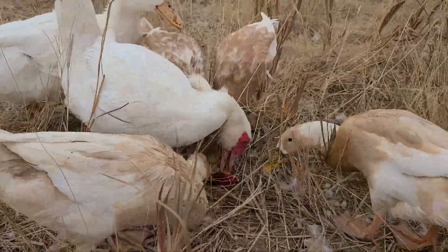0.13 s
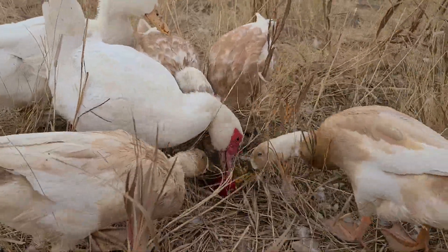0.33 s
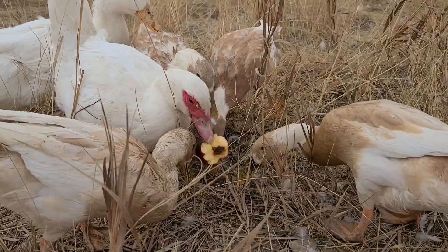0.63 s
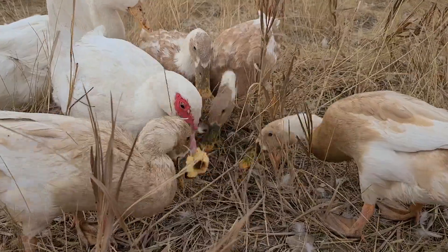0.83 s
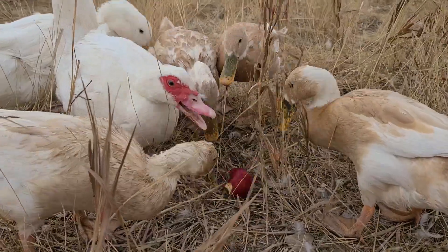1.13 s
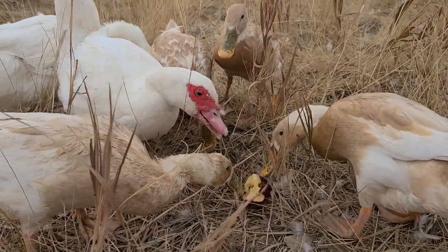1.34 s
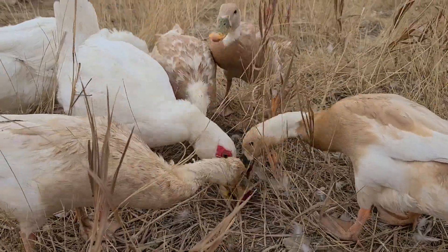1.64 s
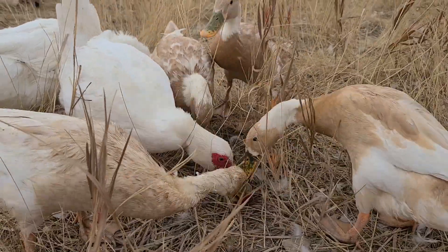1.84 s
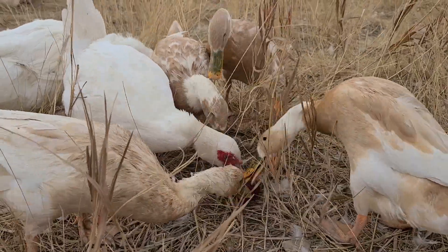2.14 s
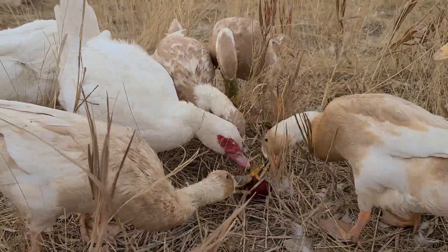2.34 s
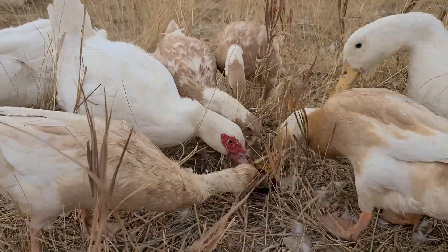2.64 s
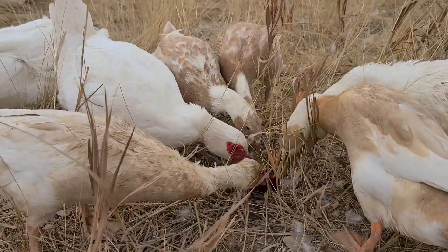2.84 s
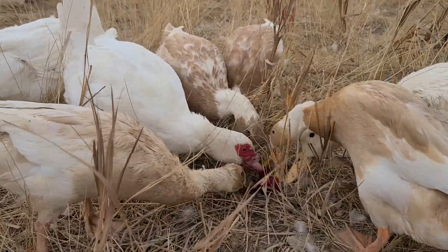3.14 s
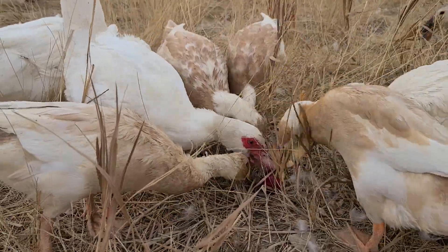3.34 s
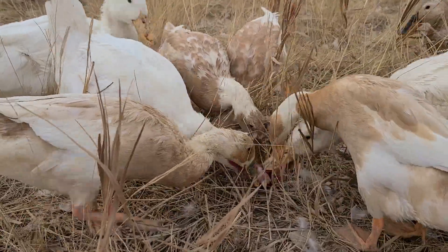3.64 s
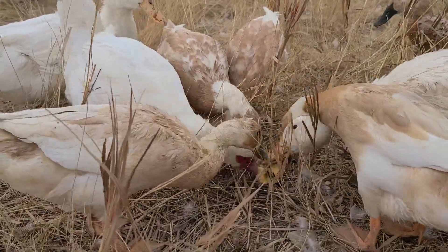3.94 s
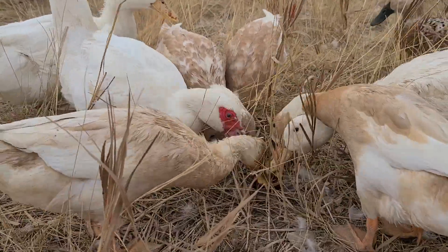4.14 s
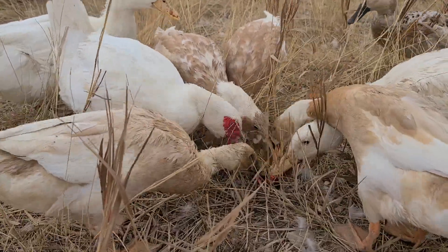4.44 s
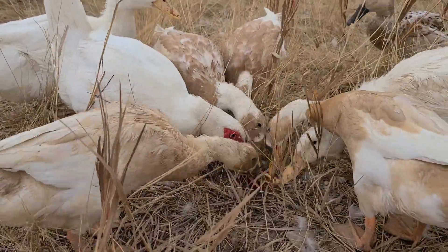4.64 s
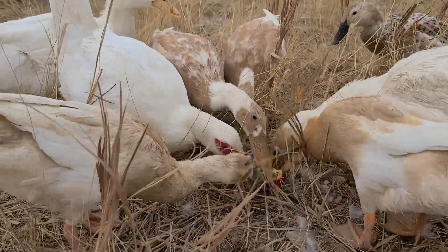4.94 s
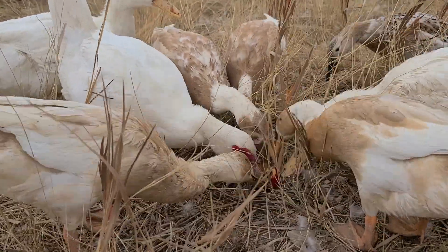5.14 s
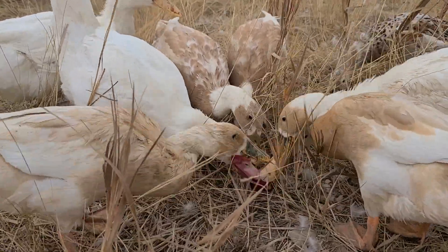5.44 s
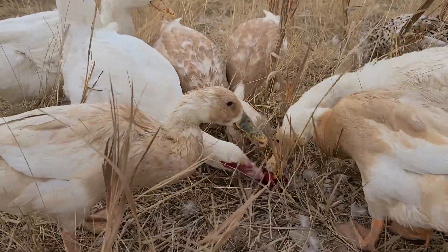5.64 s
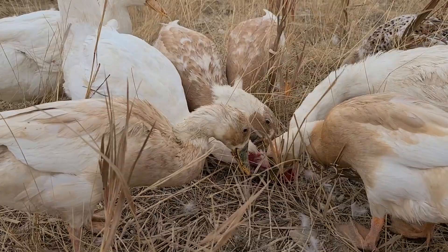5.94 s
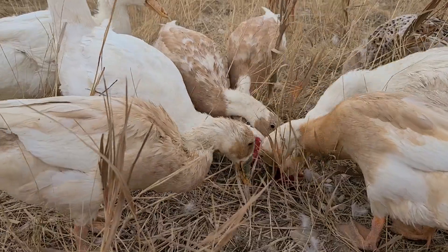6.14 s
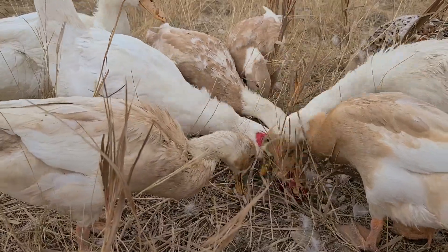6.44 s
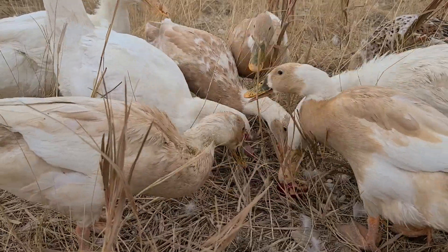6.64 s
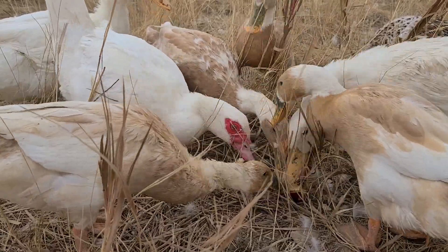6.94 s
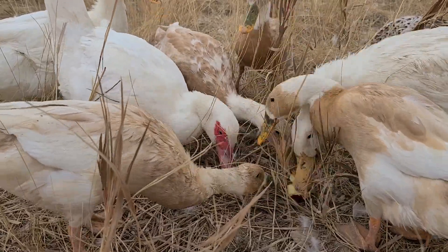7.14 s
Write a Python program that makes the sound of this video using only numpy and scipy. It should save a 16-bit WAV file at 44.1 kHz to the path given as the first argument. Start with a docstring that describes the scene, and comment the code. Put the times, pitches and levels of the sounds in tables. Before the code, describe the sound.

A flock of ducks feeds close by in dry grass, heard in open air through a phone's stereo microphone. At 0.1 and 0.26 s two loud, low, throaty quacks burst out, with a softer one just after. From about 0.75 to 1.65 s sharper, nasal quacks mix with hoarse huffs and short piping squeaks, the strongest squeak near 1.6 s. Between 1.9 and 3.5 s it is mainly squeaks sliding down, dull closed-bill clucks, two rough huffs around 2 s and one very faint quack at 2.9. Short quacks return at 3.6 and 3.9 s, then scattered around 4.4, 4.7, 5.1, 5.6 and 6 s with more huffs. Stalks rustle and snap throughout, a crisp snap standing out at 4.7 s. Low wind bumps peak near 4.5 and 5 s over a faint far hush. After 6 s, quieter huffs, low squeaks and clucks remain until about 7.3 s.

```python
"""Ducks cluck, pipe short squeaks, quack and huff while dry stalks snap and rustle in a light wind.
They crowd round a scrap of fruit in dry grass, a step from a two-port phone and a little to one side.
Quacks are membrane pulses and air puffs in throat and bill; squeaks are gliding breathy tones; huffs are
noise in slow flaps; clucks are decaying modes. Snaps, rustle, wind and far hush are coloured noise."""
import sys
import numpy as np
from scipy import signal
from scipy.fft import rfft, irfft, next_fast_len
from scipy.io import wavfile
from scipy.ndimage import uniform_filter1d

SR = 44100
rng = np.random.default_rng(int(sys.argv[2]) if len(sys.argv) > 2 else 0)


def to_wav(s):
    """Save 16-bit WAV."""
    ch = np.atleast_2d(s).T  # columns
    pcm = np.round(np.clip(ch, -1, 1) * 32767)  # PCM
    wavfile.write(sys.argv[1], SR, pcm.astype(np.int16))


N = 321489
TIME = np.arange(N) / SR


def undb(db):
    """Amplitude ratio of a level in dB."""
    return 10 ** (np.asarray(db) / 20)


def unit(x):
    """Scale to RMS 1."""
    return x / np.sqrt(np.mean(x ** 2))


def ring(x, hz, width_hz):
    """Resonance with gain 1 at its centre."""
    return signal.lfilter(*signal.iirpeak(hz, hz / width_hz, SR), x)


def steep(x, hz, width_hz):
    """Two resonances in series at one centre: steeper skirts than one."""
    return ring(ring(x, hz, width_hz), hz, 1.6 * width_hz)


def shape(x, points, trail=((0, 0), (1, 0))):
    """Colour by (f/Hz, gain/dB) points and hold back by (f/Hz, lag/rad) points."""
    size = next_fast_len(N + 64)
    f_hz = np.arange(size // 2 + 1) * SR / size
    hz, db = np.transpose(points)
    gain = undb(np.interp(np.log(f_hz + 1), np.log(hz), db))
    lag_rad = np.interp(f_hz, *np.transpose(trail))
    return irfft(rfft(x, size) * gain * np.exp(-1j * lag_rad), size)[:N]


def walk(rate_hz, size=N):
    """Random levels held 1 / rate_hz seconds and smoothed twice; spread near 1."""
    hold = int(SR / rate_hz)
    steps = np.repeat(rng.standard_normal(size // hold + 1), hold)
    return 1.7 * uniform_filter1d(uniform_filter1d(steps, hold), hold)[:size]


def add(out, x, start_s):
    """Mix x into out from start_s."""
    i = int(start_s * SR)
    out[i:i + len(x)] += x[:N - i]


def around(knots_s, db, pad_s, fade_s):
    """Time axis padded round a call, and its gain, falling 60 dB per fade_s outside the knots."""
    t = np.arange(knots_s[0] - pad_s, knots_s[-1] + pad_s, 1 / SR)
    outside_s = np.maximum(np.maximum(knots_s[0] - t, t - knots_s[-1]), 0)
    return t, undb(np.interp(t, knots_s, db) - 60 * outside_s / fade_s)


def field():
    """Steady far hush of coloured noise: one part reaches both ports, one differs at each."""
    # hush spectrum: f/Hz, relative density/dB
    field_colour = [(35, -32), (60, -0.5), (216, -1), (361, -10.5), (467, -8), (1110, -11), (1650, -9.5),
                    (3550, -25.5), (5160, -49), (7150, -36), (15800, -76)]
    level_db, shared_power = -51.5, 0.58
    hush = [unit(shape(rng.standard_normal(N), field_colour)) * undb(level_db + 0.99 * walk(7.0))
            for _ in range(3)]
    shared = np.sqrt(shared_power) * hush[0]
    apart = np.sqrt(1 - shared_power) * np.array(hush[1:])
    return shared, apart


def wind():
    """Eddies push on each port independently: low noise in short gusts."""
    # mean gust contour: t/s, level/dB
    gust_points = [(0.0, -50), (1.48, -51.5), (1.58, -29), (1.78, -48), (2.41, -31), (2.45, -46.5),
                   (2.7, -30), (2.76, -40.5), (3.36, -47), (3.67, -29), (3.73, -40.5), (4.26, -31.5),
                   (4.36, -42), (4.48, -23.5), (4.56, -41), (4.87, -40.5), (5.05, -23.5), (5.13, -40.5),
                   (6.12, -39.5), (6.81, -53.5), (6.95, -38), (7.28, -44.5)]
    # wind spectrum: f/Hz, relative gain/dB
    wind_colour = [(20, -14.5), (45, 0.5), (70, -1), (100, -6), (140, -18.5), (250, -27.5), (500, -62)]
    lean_db = 0.5  # left port above the contour, right port below
    gusts_db = np.interp(TIME, *np.transpose(gust_points))
    ports = []
    for port_db in (lean_db, -lean_db):
        gain = undb(gusts_db + port_db + 3.77 * walk(16))
        ports.append(gain * unit(shape(rng.standard_normal(N), wind_colour)))
    return np.array(ports)


def grass():
    """Snaps are brief decaying noise bands; rustle is grainy hiss that swells when a bird brushes past."""
    # dry stalks snapping: t/s, level before decay/dB, centre f/Hz
    snap_table = [(1.0094, -39, 3450), (1.836, -44, 3540), (1.9915, -39, 3870), (2.503, -39.5, 4650),
                  (3.491, -41, 3400), (3.6914, -35, 6800), (3.739, -39, 3890), (3.8123, -36.5, 9450),
                  (3.9743, -38.5, 4150), (4.0372, -37, 3560), (4.069, -33.5, 6800), (4.492, -37, 4000),
                  (4.671, -28, 4790), (5.384, -36.5, 3540), (6.2853, -43, 4900), (6.3118, -36, 8500),
                  (6.814, -39, 9800), (7.1701, -38, 3180)]
    # birds brushing through stalks: middle t/s, peak level/dB, 1/e power width/s
    swish_table = [(0.0, -57, 0.12), (0.32, -58, 0.2), (0.662, -46, 0.048), (1.137, -46.5, 0.067),
                   (1.277, -50, 0.16), (1.612, -45.5, 0.12), (2.182, -49, 0.21), (2.852, -44.5, 0.1),
                   (3.617, -47, 0.14), (3.823, -60, 0.05), (4.07, -45.5, 0.06), (4.377, -63, 0.14),
                   (4.69, -42.5, 0.076), (4.973, -42, 0.068), (5.151, -45, .15), (5.623, -51, 0.14),
                   (6.294, -52, 0.062), (6.657, -54, 0.39), (7.25, -53.5, 0.39)]
    rustle_db = -51  # the flock never stands quite still
    snap_t60_s = 0.027
    out, t = np.zeros((2, N)), TIME[:900]
    for s, db, hz in snap_table:
        for port in out:
            crack = unit(ring(rng.standard_normal(len(t)), hz, 0.2 * hz))
            add(port, undb(db) * crack * 1000 ** (-t / snap_t60_s), s)

    swells = sum(undb(db) ** 2 * np.exp(-(2 * (TIME - s) / width_s) ** 2) for s, db, width_s in swish_table)
    power = undb(rustle_db) ** 2 + swells
    gain = np.sqrt(power) * undb(1.8 * walk(32))
    rustle_colour = [(1500, -33), (3500, 2.5), (5300, -4.5), (7000, 2.5),
                     (10500, -0.5), (13000, 0.5), (16000, -3.5)]  # f/Hz, gain/dB
    for port in out:
        grains = rng.standard_normal(N) * undb(2.9 * rng.exponential(size=N))
        crackle_gain = undb(9 + 2.6 * np.minimum(rng.exponential(size=N), 6))
        crackle = crackle_gain * (rng.random(N) < .006) * rng.standard_normal(N)  # sparse clicks
        port += gain * unit(shape(unit(grains) + crackle, rustle_colour))
    return out


def squeaks():
    """Breath whistles faintly in the open throat, moves to a louder note as it narrows, then slides down."""
    # squeaks: pitch settles t/s, settled f/Hz, final f/Hz, length after settling/s, base level/dB
    squeak_table = [(0.092, 636, 625, 0.067, -40.5), (0.589, 1304, 820, 0.038, -39),
                    (0.829, 1150, 775, 0.027, -34), (1.02, 1315, 990, 0.0082, -44),
                    (1.189, 1736, 883, 0.03, -44), (1.291, 1390, 1260, 0.036, -33),
                    (1.381, 1226, 640, 0.03, -42), (1.531, 1684, 1080, 0.052, -49.5),
                    (1.588, 1245, 1208, 0.056, -26.5), (1.931, 1112, 692, 0.028, -41),
                    (2.052, 1580, 1292, 0.0238, -55), (2.124, 1090, 734, 0.02, -44),
                    (2.27, 1585, 780, 0.04, -43.5), (2.449, 1222, 740, 0.016, -40),
                    (2.597, 1103, 720, 0.019, -36.5), (2.811, 1017, 682, 0.021, -44.5),
                    (3.181, 1006, 966, 0.041, -38.5), (3.379, 1090, 787, 0.033, -39.5),
                    (3.565, 1063, 782, 0.01, -34.5), (3.719, 1115, 787, 0.02, -39),
                    (3.859, 1010, 777, 0.018, -34.5), (4.053, 1150, 940, 0.024, -37),
                    (4.37, 988, 930, 0.032, -38.5), (4.484, 1406, 1100, 0.015, -48.5),
                    (4.622, 1046, 918, 0.041, -37), (5.317, 1072, 770, 0.0238, -42),
                    (5.492, 1084, 770, 0.034, -41), (5.597, 1182, 1140, 0.031, -30.5),
                    (5.813, 1050, 740, 0.03, -40.5), (5.954, 991, 980, 0.052, -32),
                    (6.301, 607.4, 446, 0.01, -50), (6.497, 625, 470, 0.019, -48.5),
                    (7.013, 888, 694, 0.028, -39), (7.199, 849, 697, 0.026, -40.5)]
    overtones_db = (0, -22, -18)
    lead_s, lead_max_hz, lead_ratio = .03, 1600, 1.45
    out = np.zeros(N)
    for s, hz, end_hz, length_s, base_db in squeak_table:
        knots_s = s + np.array([-lead_s, -.25 * lead_s, 0, 0.56 * length_s, length_s])
        knots_db = base_db + np.array([-9, -5.0, 4.5, 6.5, -2.5])
        t, gain = around(knots_s, knots_db, pad_s=0.013, fade_s=0.052)
        lead_hz = min(lead_max_hz, lead_ratio * hz)
        knots_hz = [.85 * lead_hz, lead_hz, hz, .7 * hz + 0.282 * end_hz, end_hz]
        pitch_hz = np.interp(t, knots_s, knots_hz)
        phase = 2 * np.pi * np.cumsum(pitch_hz * (1 + 0.0328 * walk(300, size=len(t)))) / SR
        tone = sum(undb(d) * np.sin((k + 1) * phase) for k, d in enumerate(overtones_db))
        # turbulence makes the note hoarse and wraps it in air
        hoarse = tone * (1 + .35 * walk(600, size=len(t)))
        air = undb(-14) * unit(steep(rng.standard_normal(len(t)), 1200, 900))
        add(out, gain * (hoarse + air), t[0])
    return out


def quacks():
    """Membrane pulses with an air puff per cycle ring chest, throat and bill; breath leads and trails."""
    # quacks: start t/s, length/s, first pitch f/Hz, last pitch f/Hz, level/dB, throat f/Hz,
    # throat width/Hz, throat over chest/dB, bill brightness/dB, roughness [0-1]
    quack_table = [(.108, 0.043, 188.2, 211, -12.5, 1069, 262, 12, -33, 0.3),
                   (.258, 0.068, 220, 186.5, -8.5, 1132, 290, 14, -32.5, 0.21),
                   (0.329, 0.061, 387.6, 217, -22, 1270, 450, -7, -20.5, 0.22),
                   (0.765, 0.067, 487.5, 242.2, -23, 1340, 850, -4.5, -15, 0.46),
                   (1.087, 0.05, 522, 260.7, -25.5, 1810, 410, -1.5, -3, .4),
                   (1.312, 0.061, 343, 272, -16, 1529, 465, 9, -7, 0.54),
                   (1.586, 0.059, 339.3, 279.2, -18.5, 1520, 286, 5.5, -2.5, 0.41),
                   (2.885, 0.06, 234.3, 282, -40, 1050, 260, -7.5, -23, 0.49),
                   (3.584, 0.058, 341, 236.5, -20, 1420, 650, .5, -19.5, 0.46),
                   (3.867, 0.047, 279.6, 218, -19.5, 1167, 517, -4, -23, 0.33),
                   (4.384, .046, 328.7, 241, -27, 1260, 550, 5, -8.5, 0.44),
                   (4.657, 0.029, 250.2, 198, -20.5, 1370, 470, 7, -18, 0.59),
                   (5.125, .064, 366, 248, -23.5, 1470, 740, 0, -10.5, 0.5),
                   (5.608, 0.055, 311.8, 228.4, -21, 1270, 520, -4, -16, 0.31),
                   (5.959, 0.055, 299.6, 208.2, -21.5, 1180, 430, -8.5, -17, .11)]
    # bill resonances: f/Hz, width/Hz, gain/dB
    bill_modes = [(2295, 280, 11.5), (2670, 850, 7.5), (3403, 190, 12.5), (4230, 285, 11), (5300, 790, 7.5),
                  (6730, 1000, 5.5), (8180, 460, -2)]
    # lowest harmonics, in order: level/dB
    chest_db = [1.5, 1.5, -4, -11, -15]
    attack_s, rough_attack_s = 0.0069, 0.021  # a fully rough voice takes rough_attack_s longer to speak
    release_s, sag_db = 0.017, -3
    starts_db, ends_db = -12.5, -10.5  # relative to the table level
    pitch_bend = 1.15  # over 1: the pitch moves slowly at first, then faster
    tilt = 0.2  # pulse harmonics fall as order ** -tilt
    rasp_hz, rasp_db_per_db = 5500, 0.37  # bill resonances above rasp_hz fade faster in a dull quack
    bill_follows = 0.64  # the bill opens with effort: brightness grows as this power of the level
    bill_breath_db = 6.5  # bill hiss over throat breath, before the bill brightness is added
    out = np.zeros(N)
    for (start_s, length_s, first_hz, last_hz, level_db,
         throat_hz, throat_width_hz, throat_db, bright_db, rough) in quack_table:
        knots_s = start_s + np.array([0, attack_s + rough_attack_s * rough, length_s - release_s, length_s])
        knots_db = level_db + np.array([starts_db, 0, sag_db, ends_db])
        t, gain = around(knots_s, knots_db, pad_s=.05, fade_s=.018)

        glide = np.clip((t - start_s) / length_s, 0, 1) ** pitch_bend
        pitch_hz = first_hz + (last_hz - first_hz) * glide
        jitter = .06 * rough * walk(250, size=len(t))
        shimmer = undb(5 * rough * walk(250, size=len(t)))
        phase = 2 * np.pi * np.cumsum(pitch_hz * (1 + jitter)) / SR

        order = np.arange(1, 11000 // pitch_hz.max())[:, None]
        pulses = unit(np.sum(np.cos(order * phase) / order ** tilt, axis=0)) * shimmer
        air = rng.standard_normal(len(t))
        puffs = rough * air * (1 + np.cos(phase))

        chest = shimmer * sum(undb(d) * np.cos((k + 1) * phase) for k, d in enumerate(chest_db))
        throat = steep(pulses + puffs, throat_hz, throat_width_hz)
        bill = sum(undb(d + rasp_db_per_db * bright_db * (f > rasp_hz)) * steep(pulses + 1.8 * puffs, f, w)
                   for f, w, d in bill_modes)
        body = unit(unit(chest) + undb(throat_db) * unit(throat))
        bill_opening = (gain / gain.max()) ** bill_follows
        voice = body + undb(bright_db) * unit(bill) * bill_opening

        breath_gain = undb(-16) * around(knots_s, knots_db, pad_s=.05, fade_s=.12)[1]
        throat_breath = unit(steep(air, throat_hz, 1000))
        bill_breath = undb(bill_breath_db + bright_db) * unit(steep(air, 3400, 1400))
        breath = breath_gain * (throat_breath + bill_breath)
        add(out, breath - gain * voice, t[0])
    return out


def huffs():
    """Air forced out in uneven slow flaps; each flap knocks the open throat and lets a puff through."""
    # hoarse huffs: t/s, level/dB, length/s, lowest resonance f/Hz, mean growl rate f/Hz
    huff_table = [(0.236, -33.5, 0.029, 1050, 94.5), (0.543, -28.5, 0.066, 1590, 92.2),
                  (1.072, -27, 0.043, 1560, 91.5), (1.897, -31.5, 0.068, 1620, 86.4),
                  (2.122, -28.5, 0.077, 1660, 86.8), (2.247, -48, 0.044, 1450, 96.5),
                  (4.677, -31, 0.051, 1655, 83.5), (4.941, -26.5, 0.047, 1610, 86.2),
                  (5.305, -37.5, 0.068, 1510, 87.2), (5.563, -31, 0.055, 1690, 93),
                  (5.78, -27, 0.0655, 1633, 79), (6.44, -30, 0.055, 1580, 87.6),
                  (6.563, -38.5, 0.048, 1440, 89.7), (4.11, -43, 0.04, 1660, 71)]
    # throat resonances: multiple of the lowest [1], width/Hz, mean gain/dB
    throat_modes = [(1.0, 203, 13), (1.35, 232, 4.5), (1.7, 296, -1), (2.1, 500, -9), (2.9, 900, -11.5)]
    out = np.zeros(N)
    for s, db, length_s, hz, rate_hz in huff_table:
        u = np.arange(-.3, 1.4, 1 / (length_s * SR))  # time in huff lengths
        flap = np.cumsum(rate_hz * (1 + 0.2 * walk(80, size=len(u)))) / SR % 1
        air = rng.standard_normal(len(u)) * (.3 + 1.6 * np.exp(-flap / .25))
        # the gape differs from huff to huff and shifts the weight between resonances
        gape_db = 1.5 * rng.standard_normal(len(throat_modes))
        throat = sum(undb(d + g) * steep(air, m * hz, w) for (m, w, d), g in zip(throat_modes, gape_db))
        # the throat lengthens through the huff: slowing playback slides every resonance down
        place = np.cumsum(1.07 - .13 * u)
        throat = np.interp(place, np.arange(len(u)), throat)
        hiss = undb(-18) * unit(steep(air, 4840, 1100))
        swell = np.exp(-((u - .45) / 0.41) ** 2)
        add(out, undb(db) * swell * (unit(throat) + hiss), s + u[0] * length_s)
    return out


def clucks():
    """A short push of tongue and bill rings the closed mouth, whose shape differs a little each time."""
    # dull clucks: t/s, base level/dB (mode gains add)
    cluck_table = [(0.528, -60), (0.73, -57.5), (0.977, -53.5), (1.036, -57), (1.158, -54.5), (1.275, -52),
                   (1.502, -55.5), (1.909, -54.5), (1.969, -58.5), (2.079, -55), (2.231, -55),
                   (2.389, -54.5), (2.556, -54.5), (2.77, -57), (3.135, -59), (3.218, -54.5), (3.338, -57),
                   (3.479, -56.5), (3.516, -54.5), (3.543, -54), (3.684, -57.5), (3.817, -59), (3.84, -58),
                   (4.021, -52.5), (4.287, -55), (4.328, -56.5), (4.501, -61), (4.578, -61), (5.092, -55),
                   (5.289, -57), (5.347, -50.5), (5.458, -54.5), (5.556, -52.5), (5.775, -53.5),
                   (5.918, -53.5), (6.216, -58.5), (6.296, -66), (6.424, -59), (6.982, -51), (7.037, -49.5),
                   (7.158, -55.5)]
    # closed-mouth modes, mean values: f/Hz, gain/dB, t60/s
    mouth_modes = [(252, 23, 0.03), (441, 21.5, 0.044), (732, 17, 0.024), (1136, 16, 0.034)]
    out, t = np.zeros(N), TIME[:2000]
    for s, db in cluck_table:
        gain_chance, pitch_chance = rng.standard_normal((2, len(mouth_modes)))
        modes = 0
        for (f, d, t60_s), a, b in zip(mouth_modes, gain_chance, pitch_chance):
            tone = np.sin(2 * np.pi * f * (1 + 0.074 * b) * t)
            modes = modes + undb(d + 3.5 * a) * tone * 1000 ** (-t / t60_s)
        push = np.minimum(t / .0015, 1) * (1 + .5 * walk(1200, size=len(t)))
        add(out, undb(db) * modes * push, s)
    return out


def scene():
    """Birds and shared hush reach both ports by different paths; scatter, grass and wind differ at each."""
    # level difference between ports: f/Hz, left minus right/dB
    balance = [(200, -1), (600, -1), (1250, -4.5), (2300, 1), (4400, -3.5), (8000, .5)]
    # sound bends round the phone's body: f/Hz, right port lag/rad
    right_trail = [(0, 0), (700, .95), (1980, 3.6), (2670, 5.6), (4820, 8.9), (7490, 13.2), (16000, 27.5)]
    shared, apart = field()
    birds = squeaks() + quacks() + huffs() + clucks()
    hz, db = np.transpose(balance)
    left = shape(birds + shared, np.transpose([hz, db / 2]))
    right = shape(birds + shared, np.transpose([hz, -db / 2]), right_trail)
    # stalks and bodies scatter a short dim tail of the higher sound, different at each port
    t = TIME[:4000]
    highpass = signal.butter(2, 900, "high", fs=SR)
    tails = signal.lfilter(*highpass, rng.standard_normal((2, len(t)))) * 1000 ** (-t / 0.054)
    scatter = undb(-27) * signal.fftconvolve(birds[None], tails, axes=1)[:, :N]
    return np.array([left, right]) + scatter + apart + grass() + wind()


def record(dry):
    """Round the loudest peaks softly (tanh) so the sum stays below full scale, and cut the top
    (steep elliptic low-pass)."""
    top_hz, ceiling = 15850, .85
    rounded = ceiling * np.tanh(dry / ceiling)
    return signal.sosfilt(signal.ellip(16, .3, 90, top_hz, fs=SR, output="sos"), rounded)


dry = scene()
out = record(dry)
to_wav(out)
```